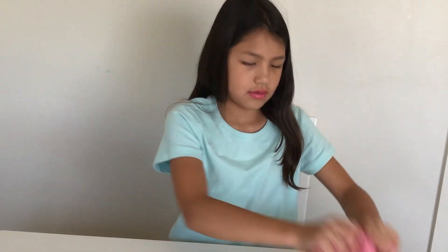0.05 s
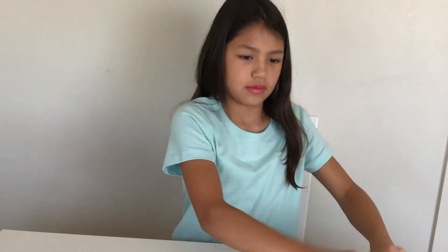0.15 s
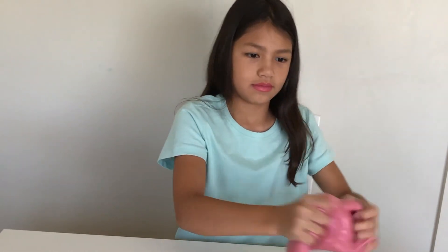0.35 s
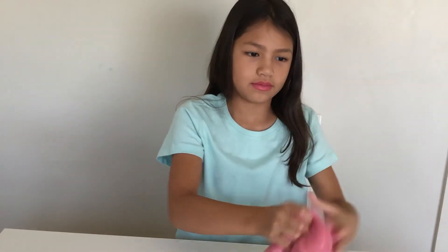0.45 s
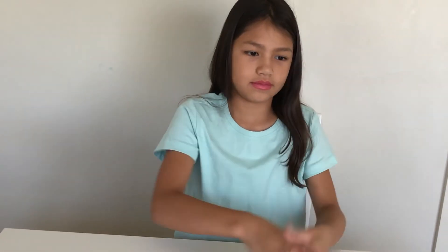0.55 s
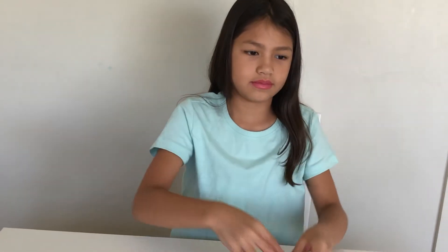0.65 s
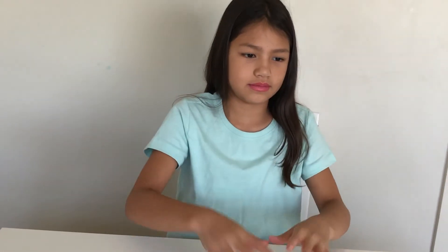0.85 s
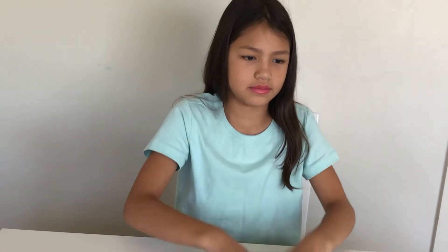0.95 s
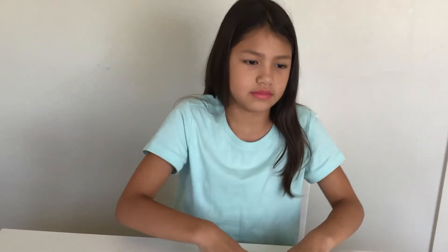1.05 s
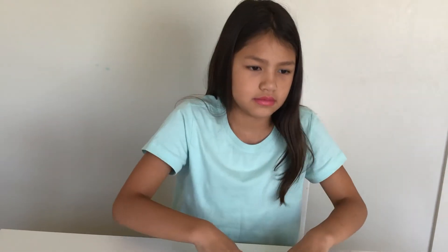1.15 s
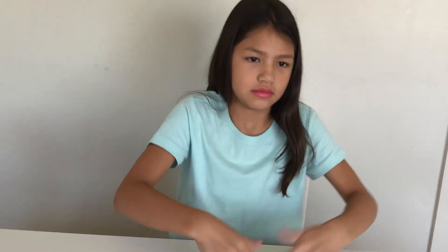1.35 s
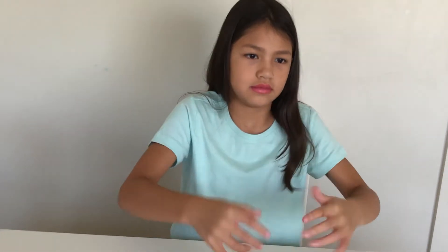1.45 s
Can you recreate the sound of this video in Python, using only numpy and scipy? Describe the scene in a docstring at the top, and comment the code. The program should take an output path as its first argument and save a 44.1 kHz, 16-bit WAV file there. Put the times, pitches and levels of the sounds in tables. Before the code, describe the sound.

Soft slime slapped on a table with a wet thud, then kneaded with sticky crackles.

```python
"""A small, bare room, one microphone near a table. A lump of soft slime crackles in the hands and is
slapped down: air spits out, the wet skin cracks and the table top thuds. Then hands peel and knead the
lump: it crackles, tiny bubbles pop, fingers bump the table, and something hard knocks at the end.
The room rings briefly behind the direct sound, over a faint room tone."""
import sys
import numpy as np
from scipy import signal
from scipy.fft import rfft, irfft
from scipy.io import wavfile

SR = 44100
rng = np.random.default_rng(int(sys.argv[2]) if len(sys.argv) > 2 else 0)


def unload_wav(signal):
    """Save mono or channel-first audio to the path in sys.argv[1] as 16-bit WAV at rate SR, clipped to [-1, 1]."""
    wavfile.write(
        sys.argv[1],
        SR,
        np.round(np.clip(np.atleast_2d(signal).T, -1, 1) * 32767).astype(np.int16),
    )


N = 66150
TOP_HZ = 16000  # upper limit of the microphone


def amp(db):
    """Decibels to gain."""
    return 10 ** (np.asarray(db) / 20)


def clock():
    """Time of every sample, in seconds."""
    return np.arange(N) / SR


def at(start, x):
    """Delay a sound to its starting time."""
    return np.concatenate([np.zeros(max(int(start * SR), 0)), x])[:N]


def fade(start, t60):
    """Exponential decay from a starting time, followed down to -120 dB."""
    decay = np.exp(-np.log(1000) * clock()[:int(2 * t60 * SR) + 1] / t60)
    return at(start, np.pad(decay, (0, N - len(decay))))


def ring(start, hz, t60):
    """One damped vibration."""
    return fade(start, t60) * np.sin(2 * np.pi * hz * (clock() - start))


def ping(start, hz, t60):
    """A vibration whose envelope swells for one time constant to 1, then dies."""
    time_constants = np.log(1000) * np.maximum(clock() - start, 0) / t60
    return np.e * time_constants * ring(start, hz, t60)


def colour(x, points):
    """Shape a signal by a curve of (frequency_hz, level_db) points, at rms 1."""
    hz, db = np.array(points).T
    bins_hz = np.arange(N // 2 + 1) * SR / N
    gain = amp(np.interp(np.log(bins_hz + 1), np.log(hz), db))
    shaped = irfft(rfft(x) * gain, N)
    return shaped / shaped.std()


def noise(points):
    """Coloured noise at rms 1."""
    return colour(rng.standard_normal(N), points)


def crackle(points, clicks_per_s=5300, spread_db=4.5):
    """Sticky slime gives dense micro-clicks of uneven size."""
    size = amp(spread_db * np.minimum(rng.exponential(size=N), 4))
    clicks = (rng.random(N) < clicks_per_s / SR) * rng.choice([-1, 1], N)
    return colour(clicks * size, points)


def fizz(count=150, low_hz=2560, high_hz=8800, t60=.0058, range_db=8):
    """Tiny air bubbles burst at random moments, each with its own pitch and size."""
    t = clock()[:int(2 * t60 * SR)]
    decay = np.exp(-np.log(1000) * t / t60)
    out = np.zeros(N + len(t))
    for when, pitch, size in rng.random((count, 3)):
        hz = low_hz * (high_hz / low_hz) ** pitch
        i = int(when * N)
        out[i:i + len(t)] += amp(range_db * size) * np.sin(2 * np.pi * hz * t) * decay
    return out[:N]


def kneading():
    """The slime crackles and fizzes as the hands work it."""
    # loudness of the handwork: time_s, level_db
    effort = [(0, -53), (0.032, -57), (0.102, -75), (.2, -71), (0.419, -76.5), (0.458, -54), (0.508, -56),
              (.555, -71.5), (.63, -60.5), (.69, -58.5), (.77, -69), (.83, -60), (.92, -77), (1.08, -77.5),
              (1.13, -68), (1.22, -65.5), (1.33, -68.5), (1.44, -81.5), (1.463, -57.5), (1.5, -53.5)]
    # colour of the sticky clicks: frequency_hz, level_db
    click_colour = [(100, -14.5), (400, 5.5), (1000, 4), (1800, -1.5), (3200, 0.5), (7000, -4.5),
                    (10500, -9), (15500, -8.5)]
    time_s, level_db = np.array(effort).T
    return (crackle(click_colour) + fizz()) * amp(np.interp(clock(), time_s, level_db))


def pops(snap_t60=.01):
    """Bubbles pop and the sticky skin lets go, each time with a tiny ring and a broad snap."""
    # single bubbles: start_s, ring_db, pitch_hz, ring_t60_s, snap_db
    bubbles = [(0.0188, -13.5, 15770, 0.00045, -63), (.4135, -57, 12000, .001, -61),
               (0.513, -42, 7700, 0.0022, -45), (0.5746, -33, 14800, .0008, -43.5),
               (0.593, -42, 10500, 0.00069, -50), (0.6168, -46.5, 7950, 0.0013, -51),
               (0.6523, -42, 4000, 0.0017, -43), (.673, -35, 3100, 0.0012, -40),
               (0.6886, -41.5, 1680, 0.0035, -51), (.835, -46.5, 6550, 0.0023, -47.5),
               (0.9503, -55, 6100, 0.0013, -65), (1.0252, -56.5, 13000, 0.00079, -61.5),
               (1.102, -50, 4200, .001, -53.5), (1.208, -53, 6950, 0.0033, -67),
               (1.247, -58, 8600, 0.00043, -60), (1.2559, -33, 4260, 0.00039, -44.5)]
    # colour of the snaps: frequency_hz, level_db
    snap_colour = [(300, 1), (1200, -2), (3000, 0.5), (7000, 3.5), (10500, -3), (15500, -2.5)]
    rings = sum(amp(db) * ping(start, hz, t60) for start, db, hz, t60, _ in bubbles)
    snaps = sum(amp(snap_db) * fade(start, snap_t60) for start, *_, snap_db in bubbles)
    return rings + snaps * noise(snap_colour)


def table_top(thud_rise_s=.0036):
    """The table's answer to one blow: clear modes over a short thud of dense, unresolved ones."""
    # modes of the table top: pitch_hz, level_db, t60_s
    modes = [(87.4, -34, 0.15), (134.8, -26.5, 0.23), (226, -33, 0.38), (282.8, -33, 0.27),
             (358, -35.5, 0.33), (439.6, -31.5, 0.17), (499.4, -28, 0.035), (621.7, -41, 0.24),
             (736.2, -21.5, 0.1), (746, -36.5, 0.49), (798, -33, 0.047), (857, -41.5, 0.36),
             (1108, -21.5, 0.04), (1863, -34.5, 0.041), (2230, -40.5, 0.031)]
    # colour of the thud: frequency_hz, level_db
    thud_colour = [(40, -32.5), (80, 8.5), (160, 6.5), (400, 4.5), (800, -4), (1200, -26.5), (2000, -16.5),
                   (5000, -32)]
    t = clock()
    ringing = np.zeros(N)
    for k, (hz, db, t60) in enumerate(modes):
        build = 1 - np.exp(-t * hz)  # a soft blow takes about a cycle to set each mode moving
        ringing += (-1) ** k * amp(db) * ring(0, hz, t60) * build
    thud_envelope = fade(0, t60=.12) * (1 - np.exp(-t / thud_rise_s))
    return ringing + amp(-23.5) * noise(thud_colour) * thud_envelope


def bumps(blow, q=1.65):
    """Soft pushes on the table: a palm excites its low modes, a fingertip the higher ones."""
    # hands meeting the table: start_s, gain_db, centre_hz
    pushes = [(.022, -35, 648), (.642, -24, 360), (.654, -23.5, 1060), (0.667, -27.5, 111),
              (.687, -22.5, 690), (.705, -24, 228), (.742, -21, 63), (0.841, -33.5, 354), (1.089, -28, 132),
              (1.15, -32, 287), (1.256, -23.5, 500), (1.262, -22.5, 340), (1.477, -24.5, 249)]
    out = np.zeros(N)
    for start, db, hz in pushes:
        push = signal.lfilter(*signal.iirpeak(hz, q, fs=SR), blow + 1e-18)
        out += amp(db) * at(start, push)
    return out


def slap(blow, start=.2286, table_lag_s=.00041, boom_hz=57.9, boom_lag_s=.095, boom_width_s=.039):
    """The lump lands: air spits, the skin cracks flat, trapped air pops, the table and the room boom."""
    # colour of the air squeezed out: frequency_hz, level_db
    spit_colour = [(200, -11.5), (900, 5.5), (2200, 4), (4000, 6), (7500, 5.5), (10000, -4.5), (15500, 1)]
    # colour of the wet skin spreading and settling: frequency_hz, level_db
    splash_colour = [(300, -15.5), (900, 4.5), (1700, -0.5), (3500, -10.5), (7000, -6), (10500, -3),
                     (15500, 8)]
    age = clock() - start
    before_contact = (age > -.0028) & (age < 0)
    after_contact = (age >= 0) & (age < .0031)
    splash = amp(-44) * crackle(splash_colour) * fade(start, t60=.2)
    spit = (amp(-23.5) * before_contact + amp(-24.5) * after_contact) * noise(spit_colour)
    crack = -amp(.5) * ring(start, hz=3130, t60=.00079)
    air_pocket = amp(-15.5) * ping(start, hz=761.4, t60=.022)
    thud = amp(1.5) * at(start + table_lag_s, blow)
    swell = np.exp(-.5 * ((age - boom_lag_s) / boom_width_s) ** 2) * (age > 0)
    boom = amp(-45) * swell * np.sin(2 * np.pi * boom_hz * age)  # the lowest room mode swells late
    return spit + crack + air_pocket + splash + thud + boom


def knock(start=1.4565, rise_s=.0048):
    """Something hard is nudged and rings briefly."""
    # modes of the hard object: pitch_hz, level_db, t60_s
    modes = [(1104, -45, 0.08), (1880, -51.5, 0.062)]
    rise = np.clip((clock() - start) / rise_s, 0, 1)
    return rise * sum(amp(db) * ring(start, hz, t60) for hz, db, t60 in modes)


def reverberation(direct, gap_s=.0033):
    """The bare room stores the energy it receives in each half-octave and lets it die away diffusely."""
    # the room's ring at the microphone: frequency_hz, level_db (re the direct sound), t60_s
    response = [(60, -26.5, 0.52), (140, -14.5, 0.69), (297, -2.5, 0.5), (762, -8, 0.46),
                (1520, -3.5, 0.42), (2980, -11, 0.42), (6970, -6, 0.34), (14800, -13, 0.33)]
    hz, db, t60 = np.array(response).T
    out = np.zeros(N)
    for centre in 50 * 2 ** np.arange(0, 8.6, .5):
        band = signal.butter(2, centre * 2 ** np.array([-.25, .25]), "band", fs=SR, output="sos")
        band_t60 = np.interp(np.log(centre), np.log(hz), t60)
        gain = amp(np.interp(np.log(centre), np.log(hz), db))
        retained = np.exp(-2 * np.log(1000) / (SR * band_t60))  # share of energy left after one sample
        stored = signal.lfilter([1 - retained], [1, -retained], signal.sosfilt(band, direct) ** 2)
        field = signal.sosfilt(band, rng.standard_normal(N))
        out += gain * np.sqrt(stored) * field / field.std()
    return at(gap_s, out)


def room_tone():
    """The still air of the room: faint, steady, mostly low noise."""
    # colour of the background: frequency_hz, level_db
    air_colour = [(15, -45), (25, -7), (134, -1), (309, -9.5), (394, 0), (489, -23), (796, -12), (936, -18),
                  (1330, -17), (4250, -35.5), (5430, -31.5), (9570, -43), (16000, -36.5)]
    return amp(-65) * noise(air_colour)


def scene():
    """What reaches the microphone, in mono: the sounds on the table, their reverberation, room tone."""
    blow = table_top()
    direct = slap(blow) + bumps(blow) + pops() + kneading() + knock()
    return (direct + reverberation(direct) + room_tone())[None]


def record(dry, bass_cut_hz=48):
    """The microphone drops the deep bass and cuts the top."""
    low_cut = signal.butter(6, bass_cut_hz, "high", fs=SR, output="sos")
    high_cut = signal.ellip(10, .2, 80, TOP_HZ, fs=SR, output="sos")
    return signal.sosfilt(high_cut, signal.sosfilt(low_cut, dry))


dry = scene()
out = record(dry)
unload_wav(out)
```